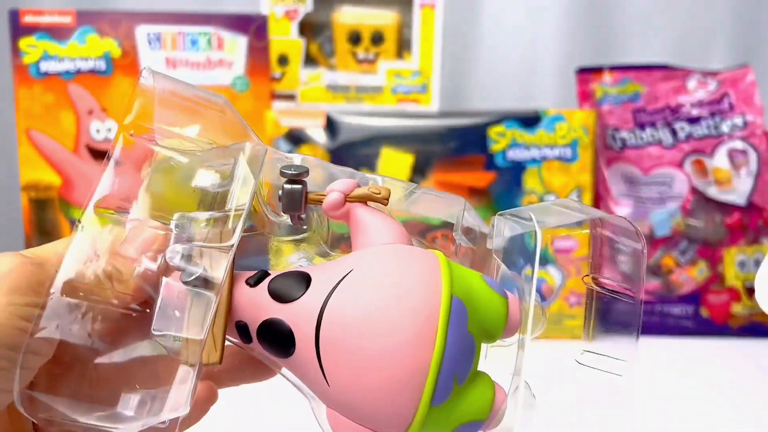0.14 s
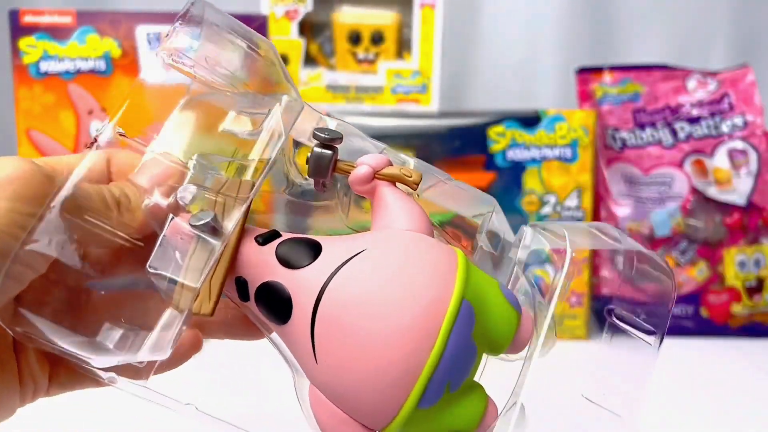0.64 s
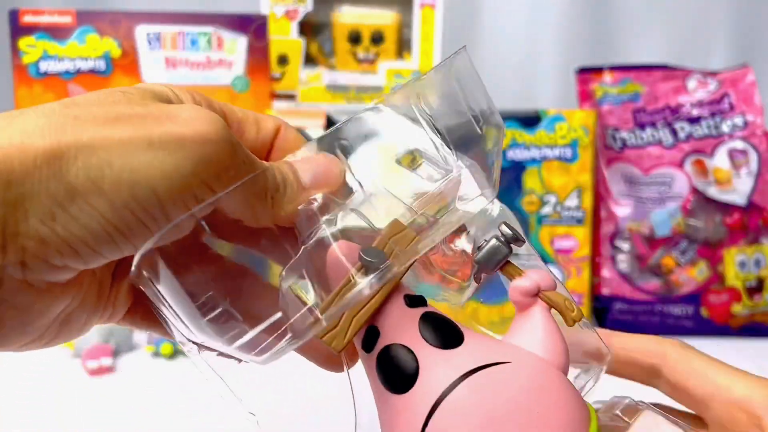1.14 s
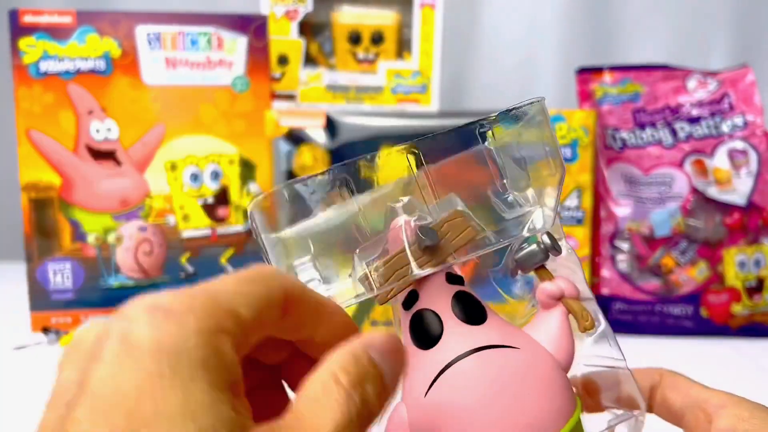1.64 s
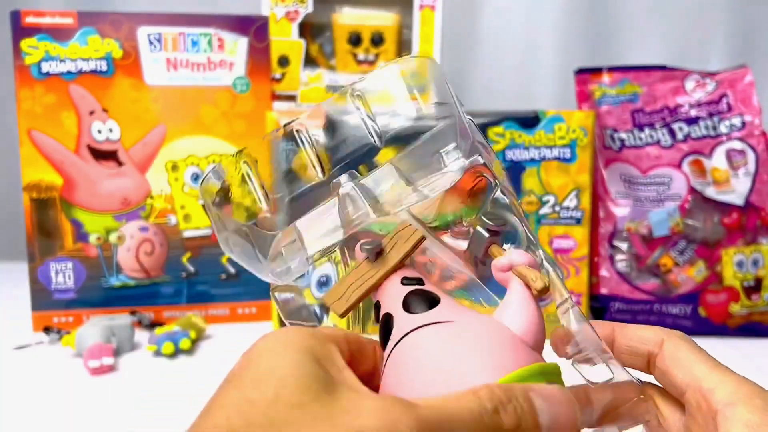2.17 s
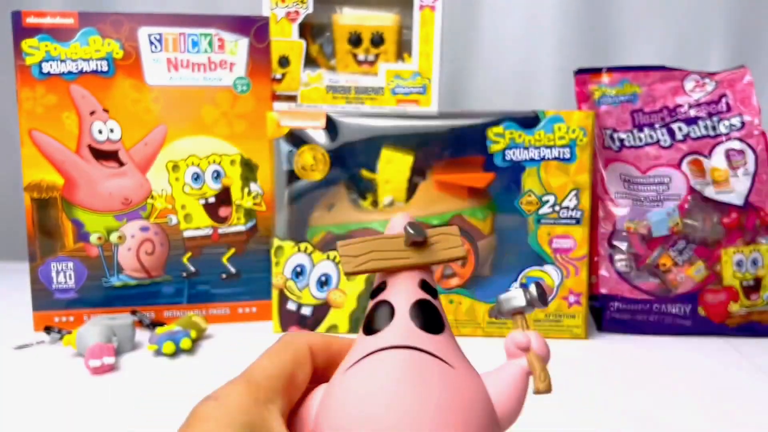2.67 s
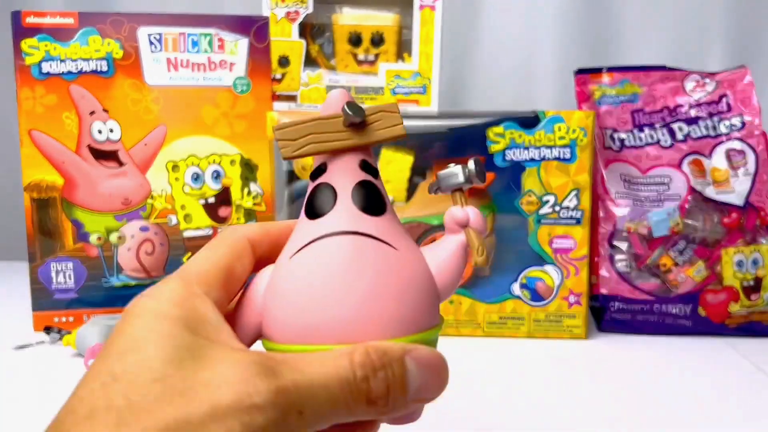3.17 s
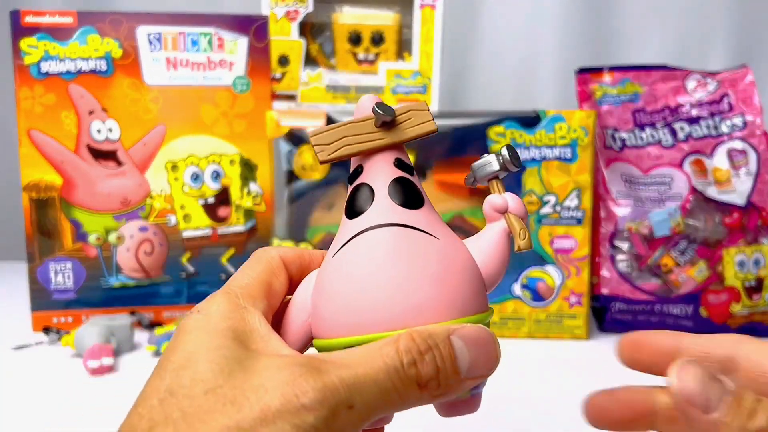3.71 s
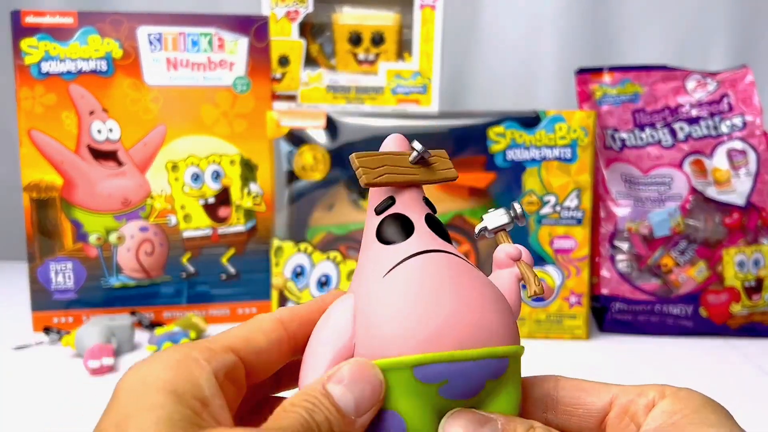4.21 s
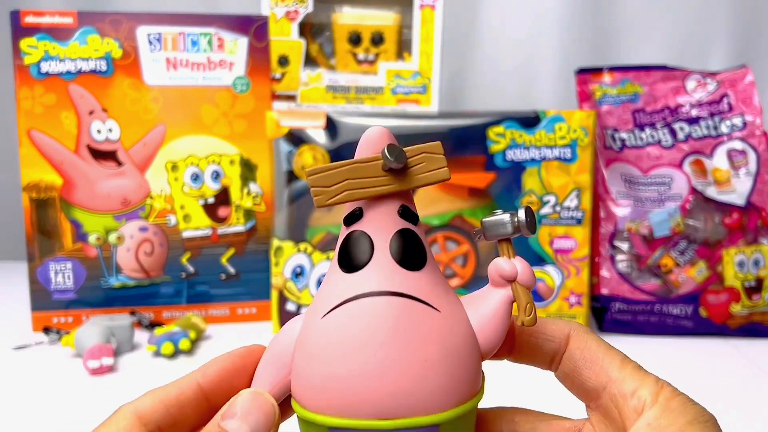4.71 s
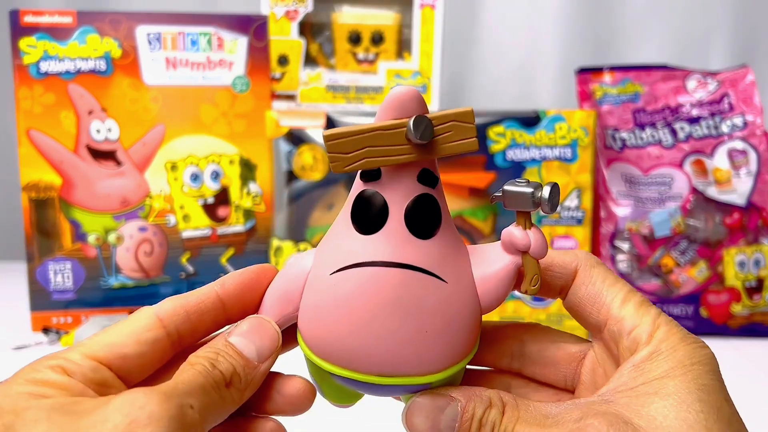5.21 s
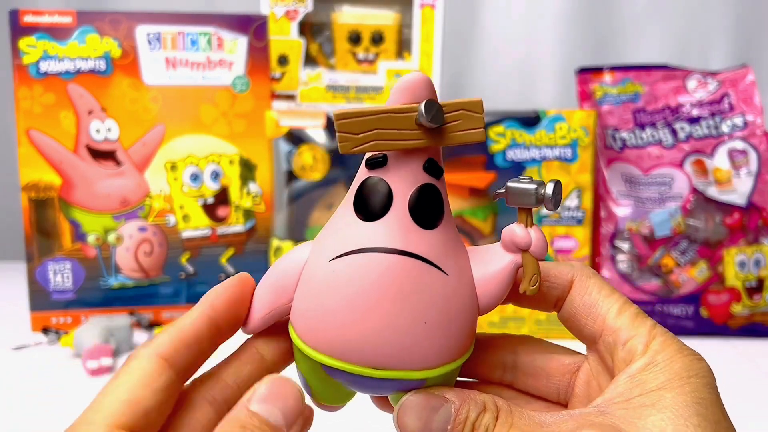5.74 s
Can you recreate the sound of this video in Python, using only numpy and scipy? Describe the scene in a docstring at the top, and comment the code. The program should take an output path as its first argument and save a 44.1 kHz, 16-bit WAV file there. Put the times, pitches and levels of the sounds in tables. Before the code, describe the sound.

A cardboard box knocks on a table, thin plastic packaging crackles and snaps sharply off a vinyl toy, then soft finger rubbing fades into quiet.

```python
"""In a quiet small room a cardboard box rocks and slides on a table, off to one side: damped modes and buckles.
Close to a two-port microphone a thin clear plastic tray is flexed and snapped off a vinyl figure:
buckles ring dense short modes, panels boom, scrape and film hiss are grainy noise.
Box and tray bump the table to the side; the empty tray is dropped there and rocks to rest on five modes.
Fingers then rub softly over the figure: swelling noise, small ringing ticks and one squeak."""
import sys
import numpy as np
from scipy import signal
from scipy.fft import rfft, irfft, next_fast_len
from scipy.io import wavfile
from scipy.ndimage import map_coordinates

SR = 44100
rng = np.random.default_rng(int(sys.argv[2]) if len(sys.argv) > 2 else 0)


def log_audio(samples):
    """Write samples as a 16-bit WAV file to the path given in sys.argv[1]."""
    # one column per channel
    frames = np.atleast_2d(samples).T
    # limit to full scale, then quantise
    limited = np.clip(frames, -1, 1)
    pcm = np.round(limited * 32767).astype(np.int16)
    wavfile.write(sys.argv[1], SR, pcm)


def natural_amplitude(level_db):
    """Convert a level in decibels to a linear amplitude factor, elementwise."""
    exponent = np.asarray(level_db, float) / 20
    return 10 ** exponent


N = 258426

# room tone spectrum: [f/Hz, relative level/dB]
AIR_SPECTRUM = [(15, -26.5), (25, -2.5), (86, 1), (194, -15.5), (254, -21), (605, -28.5), (770, -33),
                (1880, -39), (2640, -49), (8000, -51), (10400, -71.5), (17600, -120)]
AIR_DB = -64.5
# room answer against direct sound: [f/Hz, relative level/dB]
DIFFUSE_COLOUR = [(60, -12.5), (400, -9.5), (1000, -2), (3000, -0.5), (6000, 3.5), (6800, -7.5),
                  (8500, 3.5), (9500, -7), (11200, -4), (13000, -14.5), (15200, -2.5)]
# room decay: [f/Hz, t60/s]
ROOM_T60 = [(100, .18), (600, .11), (1500, .07), (8000, .05)]
# phase by which the left port leads, sources in front: [f/Hz, lead/rad]
LEAD_NEAR_RAD = [(0, 0), (1640, -0.1), (3190, 0.9), (5940, -0.3), (7410, -0.0), (8610, -1.3), (9040, -3.0),
                 (10900, -3.3), (12500, -6.2), (14500, -6.3), (15800, -9.4), (16200, -8.3)]
# the same, sources to the side: [f/Hz, lead/rad]
LEAD_ASIDE_RAD = [(0, 0), (1030, -2.8), (2500, 0.6), (3270, 1.6), (4220, 0.5), (7490, 0.0), (9040, -2.7),
                  (10900, -3.3), (12400, -6.2), (14900, -6.4), (15400, -9.3), (16200, -9.5)]
# share of the handling that is off to the side: [t/s, share]
ASIDE_SHARE = [(0, 0.6), (.93, 0.88), (.97, 0.18), (2.7, 0.46), (2.74, 0.67), (5.86, 1)]

# fingers slide over the figure: [start t/s, length/s, skin hiss level/dB, drag over hiss/dB]
RUBS = [(3.725, .35, -61, -1.5), (4.038, 0.067, -55.5, -4), (4.206, 0.062, -64.5, -1),
        (4.33, 0.13, -66, -7.5), (4.518, 0.062, -70.5, -3.5), (4.61, 0.13, -79, 0), (4.82, 0.31, -77, 3),
        (5.5, 0.16, -87.5, 0.5), (5.66, 0.12, -75, -18.5)]
RUB_RISE_S, RUB_T60_S = 0.078, 0.34
# fingertips unstick from the vinyl: [t/s, peak level/dB, centre f/Hz]
TICKS = [(4.427, -49.5, 4350), (4.445, -59.5, 1684), (4.69, -66, 1792), (5.238, -61.5, 1914),
         (5.545, -72.5, 1902), (5.659, -69, 1890)]
# a finger drags with a squeak: [t/s, level/dB]
SQUEAK_LEVEL = [(3.8, -120), (3.83, -70), (3.85, -67), (3.865, -73), (3.885, -66), (3.91, -73),
                (3.94, -120)]
# squeak spectrum: [f/Hz, relative level/dB]
SQUEAK_SPECTRUM = [(560, -40), (660, -8), (700, 0), (740, -8), (850, -24), (1000, -17), (1150, -40)]
# skin hiss spectrum: [f/Hz, relative level/dB]
SKIN_SPECTRUM = [(1500, -20), (3000, -2.5), (4500, -3.5), (6000, -8), (8500, -2), (10200, -4.5), (11800, 5),
                 (13300, -2.5), (15300, -1), (16000, -33), (16500, -70)]
# finger drag spectrum: [f/Hz, relative level/dB]
DRAG_SPECTRUM = [(600, -18), (1200, -8), (1900, 2.5), (2700, -6), (4500, -27)]
# low stir spectrum of the hands: [f/Hz, relative level/dB]
STIR_SPECTRUM = [(15, -33), (35, 11.5), (70, 0.5), (150, -12), (300, -18), (600, -45.5)]
# the hands shift about and slowly come to rest; level at the first rub
STIR_DB, STIR_FADE_DB_PER_S, STIR_SWING_DB = -61, 4, 3

# the dropped tray rocks to rest: [t/s, peak level/dB]
TRAY_KNOCKS = [(3.305, -35), (3.47, -48.5), (3.618, -50.5), (3.746, -45)]
# tray modes: [f/Hz, relative level/dB, t60/s]
TRAY_MODES = [(391, 1.5, 0.248), (517, -4.5, 0.092), (643, 1, 0.066), (1029, -6.5, 0.041),
              (1480, -32, 0.076)]
# the box rocks on its edges: [t/s, peak level/dB]
BOX_KNOCKS = [(.001, -37), (.0735, -23.5), (.198, -26.5), (.344, -28)]
# box modes: [f/Hz, relative level/dB, t60/s]
BOX_MODES = [(91, -8, .3), (301, -11, .35), (517, -10, .14), (668, -13, .07), (786, -12, .06),
             (926, -10, .04), (1150, -3, .03), (1210, 0, .04), (1330, -5, .025), (1427, -3, .03),
             (1560, -7, .025), (1707, -5, .03), (1997, -6, .025), (2400, -9, .02), (2902, -11, .02),
             (3230, -9, .025), (3575, -12, .02)]
# hollow box and tray boom when pushed: [t/s, peak level/dB, lowest mode f/Hz]
BOOMS = [(0.454, -31, 109), (0.669, -25.5, 123), (0.689, -49, 132), (.781, -27.5, 116), (0.812, -25, 124),
         (.85, -41, 91), (2.8, -18.5, 260), (2.968, -29.5, 115), (3.138, -28, 122), (3.184, -31.5, 133)]

# hands pull, twist or slide the packaging:
# [start t/s, length/s, scrape level/dB, film slide over scrape/dB, panel bend over scrape/dB]
MOVES = [(-.02, 0.046, -58.5, -18, 16), (0.455, 0.052, -56.5, -3, 12), (0.534, 0.14, -54.5, -3.5, 5.5),
         (0.627, 0.062, -49, -10, 12), (0.757, 0.07, -57.5, -23, 21.5), (0.927, 0.056, -73.5, -11, 17),
         (1.016, 0.064, -52.5, -31, 10.5), (1.081, 0.081, -48.5, -9.5, 10.5), (1.2, 0.12, -42, -7, 1.5),
         (1.381, 0.071, -43, -3.5, 0), (1.445, 0.05, -44.5, 2.5, -2), (1.568, .11, -62, -6, 3.5),
         (1.695, 0.066, -50.5, -7.5, 9.5), (1.772, 0.13, -51.5, -5.5, 9), (1.962, 0.21, -50, -10, -7),
         (2.118, 0.039, -43, -7, 10.5), (2.2, 0.062, -45, -11, 8.5), (2.35, 0.081, -43.5, -6.5, 8),
         (2.462, 0.041, -39, -7, 7), (2.547, 0.038, -47, -6.5, 7), (2.63, 0.1, -58, -1, -3.5),
         (2.765, .12, -44, 0.5, 8.5), (2.921, 0.097, -44.5, -6.5, 6.5), (3.032, 0.058, -45.5, -1.5, 7.5),
         (3.117, 0.083, -47.5, -0.5, 7), (3.224, .17, -60, -4, 3.5), (3.461, .08, -71.5, -33, 10.5)]
MOVE_RISE_S, SCRAPE_T60_S, SLIDE_T60_S, BEND_T60_S = 0.014, 0.37, 0.31, 0.29
# the packaging creeps back into shape after a move; level over scrape
SETTLE_DB, SETTLE_T60_S = -18.5, 1
# scrape and panel bend over the peak of a box knock
SHIVER_DB, SHUDDER_DB = -32.5, -19
# panel boom spectrum: [f/Hz, relative level/dB]
PANEL_SPECTRUM = [(20, -38), (50, -1.5), (100, 1), (150, -2.5), (250, -8.5), (350, -13), (500, -47)]
# edge scrape spectrum: [f/Hz, relative level/dB]
SCRAPE_SPECTRUM = [(200, -32), (400, -1), (800, 0.5), (1500, -3.5), (2200, -14), (3200, -15.5),
                   (5000, -40.5)]
# film hiss spectrum: [f/Hz, relative level/dB]
HISS_SPECTRUM = [(900, -27), (1800, 4), (3000, 2.5), (5500, -3), (8500, -3.5), (10200, -13.5),
                 (11800, -0.5), (13300, -10), (15300, -6.5), (16200, -35), (16700, -67)]

# colour of cracking film and card: [f/Hz, gain/dB]
CRACK_COLOUR = [(1500, -34), (3000, 6.5), (5500, -5), (8500, -3), (11800, -3.5), (14500, -9),
                (16200, -20.5), (16800, -67)]
# bumps of box and tray on the table: [t/s, nominal level/dB, centre f/Hz, relative bite/dB, relative crack/dB]
BUMPS = [(0.448, -31, 476, -57, -31), (0.487, -27.5, 830, -39, -28), (0.538, -34.5, 890, -42, -20),
         (0.604, -32, 540, -30, -26), (0.636, -29, 524, -39, -27), (0.655, -27, 690, -12, -16),
         (0.662, -28.5, 503, -37, -34), (0.674, -32, 397, -8, -15), (0.754, -34, 597, -55, -33),
         (2.756, -26, 980, -6, -17.5), (2.799, -10.5, 646, -37.5, -17.5), (2.829, -15.5, 762, -31, -22),
         (2.847, -16.5, 700, -25, -24), (2.869, -31.5, 647, -16.5, -14), (2.956, -16.5, 890, -39, -32),
         (3.044, -20, 443, -25, -10), (3.069, -27, 465, -51, -25), (3.123, -33.5, 490, -3, -7.5),
         (3.144, -33, 1150, -46, -4.5), (3.194, -35, 560, -36, -38), (3.251, -27.5, 1463, -6, -9.5)]
# buckling snaps of the tray in the hands: columns as BUMPS
SNAPS = [(0.947, -62, 430, -10, 1), (1.004, -40, 1830, -6, -21), (1.017, -29, 420, -12, -26),
         (1.031, -25.5, 1180, -10, -16), (1.077, -36, 2820, 8, -14), (1.096, -25, 388, -12, -33),
         (1.104, -22, 1110, -8, -16.5), (1.123, -22.5, 1200, -28, -21), (1.186, -24.5, 1230, -10, -18),
         (1.225, -31, 1550, -27, -12), (1.23, -23.5, 1660, -11, -25), (1.282, -21.5, 1390, -8, -20),
         (1.304, -16, 785, -19, -29), (1.315, -18, 334, -6, -23), (1.377, -21, 506, -30, -22),
         (1.391, -27, 517, -13, -23), (1.409, -35.5, 536, -17, -9), (1.446, -28.5, 1390, -33, -23),
         (1.465, -23, 674, -16.5, -28), (1.478, -21, 740, -15, -23), (1.5, -23, 820, -8, -19),
         (1.704, -29.5, 860, -3, -22), (1.738, -17.5, 1210, -9, -15.5), (1.778, -23, 406.7, -34, -22),
         (1.79, -18.5, 410, -7, -36), (1.802, -21, 382, 3.5, -16), (1.817, -21.5, 506, -18, -33),
         (1.842, -25, 860, -18, -24), (1.883, -32.5, 406, -10, -34), (1.978, -41, 802, -4, -31),
         (2.009, -24, 483, -30, -52), (2.026, -34, 424, -24, -40), (2.043, -18.5, 810, -29, -34),
         (2.065, -11, 1510, -17, -27), (2.123, -14, 980, 1, -32), (2.138, -11.5, 470, -27, -21.5),
         (2.151, -13.5, 1546, -16.5, -21), (2.159, -16, 844, -4.5, -31), (2.19, -24, 830.5, -23, -31),
         (2.204, -28, 1160, -21, -24), (2.214, -10.5, 1325, -13, -31.5), (2.222, -18, 905, -24, -26.5),
         (2.231, -17.5, 890, -8, -21), (2.246, -26.5, 1100, -14, -20.5), (2.268, -25, 1792, -11.5, -17.5),
         (2.272, -20, 1378, -26, -37), (2.339, -20, 1417, -4.5, -29), (2.373, -23, 396.2, -5, -19),
         (2.386, -15.5, 846, -7, -27.5), (2.399, -18, 1902, -12.5, -22.5), (2.411, -24.5, 812, -19, -25.5),
         (2.489, -2.5, 897, -2.5, -21), (2.559, -27, 1150, -5.5, -16), (2.572, -22.5, 1159, -9.5, -13.5),
         (2.583, -30.5, 971, -20, -14.5)]
# small random buckles; least nominal level over the scrape of their move
CRINKLES_PER_MOVE, CRINKLE_DB = 4, 8


def unit(x):
    """Scales to rms 1."""
    return x / np.sqrt(np.mean(x ** 2) + 1e-20)


def along(points, hz):
    """Reads (Hz, value) points on a log frequency axis."""
    f, v = np.transpose(points)
    return np.interp(np.log(hz + 1), np.log(f + 1), v)


def curves(rows):
    """One value per sample for each column after the time."""
    s, *cols = np.transpose(rows)
    return [np.interp(np.arange(N) / SR, s, c) for c in cols]


def wobble(rate_hz):
    """A smooth random curve with rate_hz knots a second."""
    knots = rng.standard_normal(int(N * rate_hz / SR) + 4)
    return map_coordinates(knots, [np.arange(N) * rate_hz / SR])


def filtered(x, response):
    """Applies a complex response of frequency to x."""
    m = next_fast_len(N + SR // 2)
    return irfft(rfft(x, m) * response(np.fft.rfftfreq(m, 1 / SR)), m)[..., :N]


def add(track, s, sound, db):
    """Mixes a sound in at s seconds, its peak at db."""
    track[round(s * SR):][:len(sound)] += natural_amplitude(db) * sound / np.abs(sound).max()


def swells(start_s, length_s, db, rise_s, t60_s):
    """Gestures that rise, hold and die away; their powers add."""
    grid = np.arange(0, N + 64, 64)
    t = grid / SR - np.c_[start_s]
    decay_db = 60 * np.maximum(t - np.c_[length_s], 0) / t60_s
    shape = np.clip(t / rise_s, 0, 1) ** 2 * natural_amplitude(np.c_[db] - decay_db)
    return np.interp(np.arange(N), grid, np.sqrt(np.sum(shape ** 2, axis=0)))


def ring(hz, db, t60_s, late_s, seconds, rise_cycles=0.13):
    """Damped modes, each starting late by its own delay and swelling over part of a cycle."""
    t = np.maximum(np.arange(int(seconds * SR)) / SR - np.c_[late_s], 0)
    swell = 1 - np.exp(-t * np.c_[hz] / rise_cycles)
    decay = natural_amplitude(np.c_[db] - 60 * t / np.c_[t60_s])
    return np.sum(swell * decay * np.sin(2 * np.pi * np.c_[hz] * t), axis=0)


def burst(t60_s, rise_s):
    """A puff of noise that dies fast."""
    t = np.arange(SR // 12) / SR
    return rng.standard_normal(len(t)) * natural_amplitude(-60 * t / t60_s) * (1 - np.exp(-t / rise_s))


def crisp(track):
    """Gives puffs of noise the colour of cracking film and card."""
    return filtered(track[:N], lambda hz: natural_amplitude(along(CRACK_COLOUR, hz)))


def rustle(spectrum, slips_per_s, scatter_db, grain_share):
    """Noise mixed with tiny slips of uneven size, all through one colour; rms 1."""
    size = natural_amplitude(scatter_db * np.minimum(rng.exponential(size=N), 3))
    slips = (rng.random(N) < slips_per_s / SR) * size * rng.standard_normal(N)
    share = np.clip(grain_share, 0, 1)
    mix = np.sqrt(share) * unit(slips) + np.sqrt(1 - share) * rng.standard_normal(N)
    return unit(filtered(mix, lambda hz: natural_amplitude(along(spectrum, hz))))


def room_tone():
    """Steady noise of the quiet room, mostly low."""
    return natural_amplitude(AIR_DB) * rustle(AIR_SPECTRUM, 10, scatter_db=.1, grain_share=0)


def room_answer(x, every_s=.2):
    """The room's short tail at each port: decaying noise, drawn anew for every stretch of sound."""
    wet, step = np.zeros((2, N + SR)), round(every_s * SR)
    for start in range(0, N, step):
        hz, t, z = signal.stft(rng.standard_normal((2, SR // 5)), SR, nperseg=256)
        decay = natural_amplitude(-60 * t / along(ROOM_T60, hz)[:, None])
        tail = signal.istft(z * decay, SR, nperseg=256)[1]
        tail = tail / np.linalg.norm(tail[0])
        piece = signal.fftconvolve(x[None, start:start + step], tail, axes=1)
        wet[:, start:start + piece.shape[1]] += piece
    return wet[:, :N]


def ports(x, lead, pan_db, room_db):
    """The two ports hear the direct sound at different phases; the room answers differently at each."""
    f, radians = np.transpose(lead)
    direct = filtered(x, lambda hz: np.exp(.5j * np.outer([1, -1], np.interp(hz, f, radians))))
    wet = filtered(room_answer(x), lambda hz: natural_amplitude(room_db + along(DIFFUSE_COLOUR, hz)))
    return direct * natural_amplitude([[pan_db / 2], [-pan_db / 2]]) + wet


def fingers():
    """Skin slides over vinyl: a soft hiss, a drag, a low stir, small ticks and one unsteady squeak."""
    ticks = np.zeros(N + SR)
    for s, db, hz in TICKS:
        r = rng.standard_normal((2, 8))
        tick = ring(hz * np.exp(0.25 * r[0]), 3 * r[1], np.full(8, 0.029), np.zeros(8), .05)
        add(ticks, s, tick, db)
    squeak = natural_amplitude(curves(SQUEAK_LEVEL)[0]) * rustle(SQUEAK_SPECTRUM, 120, scatter_db=-2.0, grain_share=0.19)

    s, length, db, drag_db = np.transpose(RUBS)
    drag = swells(s, length, db + drag_db, RUB_RISE_S, RUB_T60_S) * natural_amplitude(-5.5 + 2.1 * wobble(30))
    drag *= rustle(DRAG_SPECTRUM, 500, scatter_db=4.0, grain_share=.2)
    skin = swells(s, length, db, RUB_RISE_S, RUB_T60_S) * natural_amplitude(0.61 * wobble(47))
    skin *= rustle(SKIN_SPECTRUM, 1200, scatter_db=5.5, grain_share=0.11)

    since_first_s = np.arange(N) / SR - s[0]
    stir_db = STIR_DB - STIR_FADE_DB_PER_S * since_first_s + STIR_SWING_DB * wobble(7.9)
    stir = natural_amplitude(stir_db + 0.83 * wobble(27)) * rustle(STIR_SPECTRUM, 37, scatter_db=-5.0, grain_share=0.048)
    stir *= np.clip(curves([(3.4, 0.12), (3.7, 1)])[0], 0, 1)
    return ticks[:N] + squeak + drag + skin + stir


def knocks(events, modes, crack_db):
    """One hollow body: every knock rings its modes at new strengths, with a puff of crack."""
    track, cracks = np.zeros(N + SR), np.zeros(N + SR)
    hz, level, t60_s = np.transpose(modes)
    for s, db in events:
        r = rng.standard_normal((2, len(hz)))
        add(track, s, ring(hz, level + 2 * r[0], t60_s, 0.001 * np.abs(r[1]), .4), db)
        add(cracks, s, burst(.016, rise_s=.0004), db + crack_db)
    return track[:N] + crisp(cracks)


def booms():
    """Each push sets a few low panel modes swinging for some cycles."""
    track = np.zeros(N + SR)
    for s, db, hz in BOOMS:
        modes = hz * np.array([1, 1.4, 1.9]) * np.exp(0.037 * rng.standard_normal(3))
        boom = ring(modes, [0, -6, -9], [.09, .06, .05], [0, 0, 0], .15, rise_cycles=0.48)
        add(track, s, boom, db)
    return track[:N]


def handling():
    """In each move panels boom as they flex, edges scrape in jerks and film hisses; box knocks shake the card too."""
    s, length, db, slide_db, bend_db = np.transpose(MOVES)
    hit, hit_db = np.transpose(BOX_KNOCKS)
    edges = swells(s, length, db, MOVE_RISE_S, SCRAPE_T60_S)
    edges += swells(hit, 0 * hit, hit_db + SHIVER_DB, .003, 0.74)
    bends = swells(s, length, db + bend_db, MOVE_RISE_S, BEND_T60_S)
    bends += swells(hit, 0 * hit, hit_db + SHUDDER_DB, 0.0054, 0.47)
    settle = swells(s, length, db + SETTLE_DB, MOVE_RISE_S, SETTLE_T60_S)
    jerk = wobble(45)  # shared by scrape and film
    panel = (bends + natural_amplitude(2) * settle) * natural_amplitude(1.5 * wobble(25))
    panel *= rustle(PANEL_SPECTRUM, 76, scatter_db=-0.5, grain_share=0.34)
    scrape = (edges + settle) * natural_amplitude(2.9 * jerk)
    scrape *= rustle(SCRAPE_SPECTRUM, 250, scatter_db=2.5, grain_share=0.27)
    film = swells(s, length, db + slide_db, MOVE_RISE_S, SLIDE_T60_S) * natural_amplitude(2.5 * jerk + 0.7 * wobble(120))
    film *= rustle(HISS_SPECTRUM, 1500, scatter_db=2.0, grain_share=.25)
    return panel + scrape + film


def crinkles():
    """Small buckles scattered at random through every move, as rows like SNAPS."""
    rows = []
    for s, length, db, *_ in MOVES:
        for a, b, c, d in rng.random((CRINKLES_PER_MOVE, 4)):
            rows.append((abs(s + length * a), db + CRINKLE_DB + 8 * b, 500 * 4 ** c, -20 + 16 * d, -22))
    return rows


def buckles(events, t60_s, lag_cycles, boom_db, click_db, crack_t60_s):
    """Each buckle rings the sheet in a new shape: dense short modes from boom to bite, and a crack on top."""
    track, cracks = np.zeros(N + SR), np.zeros(N + SR)
    ladder = np.geomspace(230, 4300, num=44)
    for s, db, hz, bite_db, crack_db in events:
        r = rng.standard_normal((3, len(ladder)))
        modes = ladder * np.exp(0.035 * r[0])
        shape = [(300, boom_db + 4 * np.log2(700 / hz)), (550, -4.5), (1500, -1.5),
                 (2300, bite_db + 8.0), (4300, bite_db - 12.0)]
        near_centre_db = 8 * np.exp(-(np.log(modes / hz) / 0.16) ** 2)
        level_db = along(shape, modes) + near_centre_db + 3 * r[1]
        # big buckles and low modes ring longer; t60_s holds at 1 kHz and -22.5 dB
        life_s = t60_s * natural_amplitude(.07 * (db + 22.5)) * (1000 / modes) ** 0.87
        # bending waves are slower when low, so the top arrives first
        late_s = lag_cycles * np.abs(r[2]) / modes * (1000 / modes) ** 0.406
        sheet = ring(modes, level_db, life_s, late_s, 0.11, rise_cycles=0.69)
        add(track, s, sheet, db - 3)
        for wait_s in (.0045, .0095):  # a big buckle sets off its neighbours
            add(track, s + wait_s * np.exp(.2 * r[2, 0]), sheet, db - 20 + .75 * (db + 20))
        crease = ring([1500, 2300], [0, bite_db + 6.5], [.006, .004], [0, 0], .01)
        add(track, s + 0.001183, crease, db + click_db + 1.5)  # the crease flips
        add(cracks, s + .0005, burst(crack_t60_s, rise_s=0.0011), db + crack_db + 14.5)
    return track[:N] + crisp(cracks)


def scene():
    """Hands in front, table to one side, room tone all round."""
    aside, hands = np.clip(curves(ASIDE_SHARE)[0], 0, 1), handling()
    near = room_tone() + fingers() + booms() + (1 - aside) * hands
    near += buckles(SNAPS + crinkles(), t60_s=0.038, lag_cycles=.8, boom_db=-9.5,
                    click_db=-2.5, crack_t60_s=0.015)
    side = knocks(BOX_KNOCKS, BOX_MODES, crack_db=-8) + knocks(TRAY_KNOCKS, TRAY_MODES, crack_db=-33.5)
    side += aside * hands
    side += buckles(BUMPS, t60_s=0.075, lag_cycles=2.502, boom_db=-11.5,
                    click_db=-21.5, crack_t60_s=0.019)
    front = ports(near, LEAD_NEAR_RAD, pan_db=0.74, room_db=-4.5)
    return front + ports(side, LEAD_ASIDE_RAD, pan_db=-1.0, room_db=-3.0)


def top_cut(x):
    """Nothing passes above the cut-off."""
    return signal.sosfilt(signal.butter(12, 16620, fs=SR, output="sos"), x)


def record(dry):
    """The microphone rolls off the deep bass: two first-order high-passes at 45 Hz."""
    mix = filtered(dry, lambda hz: (1j * hz / (45 + 1j * hz)) ** 2)
    return top_cut(mix)


dry = scene()
out = record(dry)
log_audio(out)
```